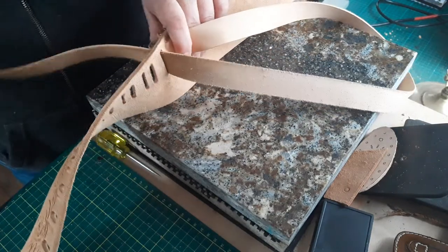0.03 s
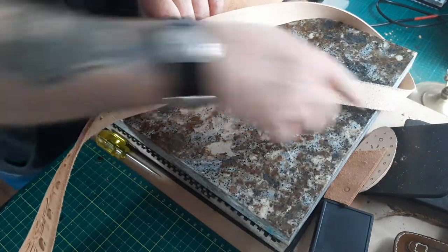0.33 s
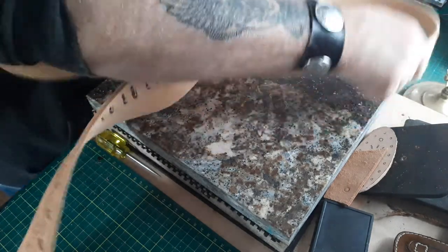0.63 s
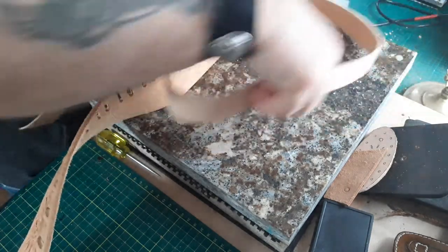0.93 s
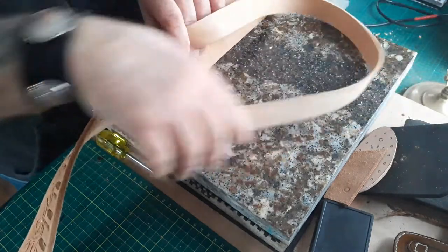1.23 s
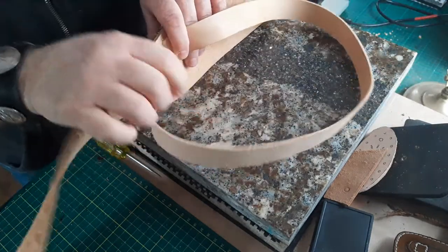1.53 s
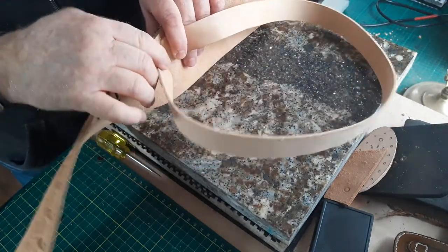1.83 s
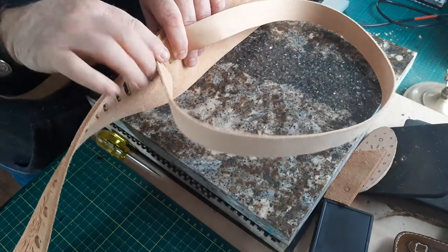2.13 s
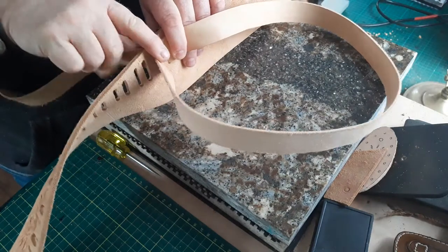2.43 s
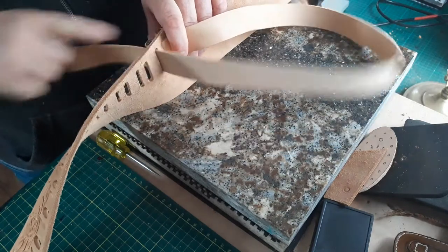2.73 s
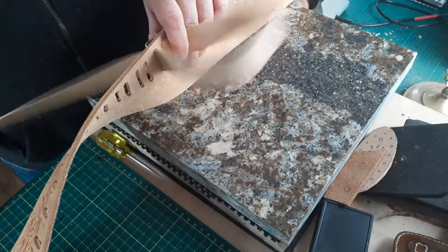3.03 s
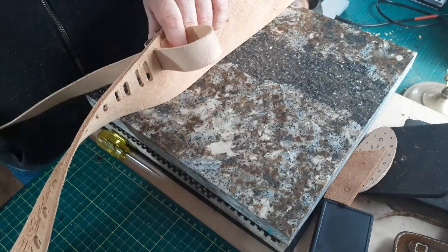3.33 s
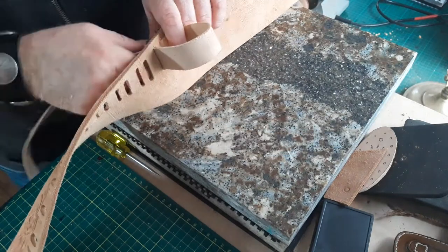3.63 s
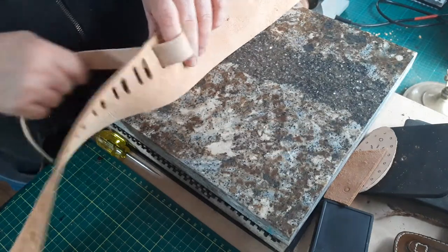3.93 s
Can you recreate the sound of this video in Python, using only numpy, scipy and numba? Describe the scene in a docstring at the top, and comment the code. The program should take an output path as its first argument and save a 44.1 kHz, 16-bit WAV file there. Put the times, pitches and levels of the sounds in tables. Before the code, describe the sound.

A leather strap is handled close by in a small room. It thumps softly on a slab at 0.4 seconds, followed by faint hand brushing and light knocks near 2.3. From 2.6 to 3.2 comes the main sound: one accelerating, rising rasp through a belt slot, with slight squeaks. Rubbing returns at 3.5, then a knock and two fingernail ticks around 3.9, over a faint low hum.

```python
"""Threading a leather strap

On a workbench in a small room, hands brush along a strap: catching fibres scuff, hiss and chirp.
The strap flops and knocks on the slab in damped thumps; fingernails and edges tick. One long,
accelerating pull drags it rasping through a slot in a belt, ringing the belt while the strap's
own resonance climbs. A low hum and faint hiss lie below."""
import sys
import numpy as np
from scipy import signal
from scipy.fft import rfft, irfft
from scipy.io import wavfile
from numba import njit

SR = 44100
rng = np.random.default_rng(int(sys.argv[2]) if len(sys.argv) > 2 else 0)


def int16_out(signal):
    """Quantize to a 16-bit WAV file."""
    q = np.round(np.clip(np.atleast_2d(signal).T, -1, 1) * 32767)
    wavfile.write(sys.argv[1], SR, q.astype(np.int16))


N = 176400
T, FREQS = np.arange(N) / SR, np.maximum(np.fft.rfftfreq(N) * SR, 1)

# envelope of the long pull: (time [s], friction level [dB], hiss boost [dB])
PULL_ENVELOPE = [(2.56, -86, 10), (2.615, -71, 20), (2.67, -59.5, 8), (2.775, -54, 5), (2.815, -44.5, 1),
                 (3.065, -37.5, -0.5), (3.098, -39.5, 1.5), (3.114, -49, 5.5), (3.152, -45.5, 2),
                 (3.19, -73, 13), (3.3, -75, 2)]
# the strap resonates higher as the pull speeds up: (time [s], centre [Hz], level [dB])
STRAP_SWEEP = [(2.6, 630, -83), (2.67, 670, -50.5), (2.78, 800, -50.5), (2.86, 985, -42.5),
               (3.03, 1300, -46.5), (3.09, 1390, -81)]
# resonances of the slotted belt: (pitch [Hz], width [Hz], level against the friction [dB])
BELT_MODES = [(205, 28, -19.5), (455, 19, -16.5), (1279, 12, -10.5)]
# brush strokes: (start [s], attack [s], hold [s], scuff [dB], rasp [dB], hiss [dB])
STROKES = [ (0.372, .012, 0.1, -72, -68.5, -58.5), (0.496, 0.028, 0.078, -67.5, -62, -55.5),
           (0.745, 0.038, 0.08, -68.5, -72.5, -66), (0.879, 0.0056, 0.039, -70, -55.5, -66),
           (0.96, 0.056, 0.031, -84, -67, -59), (1.135, 0.013, 0.058, -71, -67.5, -61.5),
           (1.28, 0.032, 0.072, -75.5, -87, -65.5), (1.495, 0.063, 0.07, -68, -70.5, -62),
           (1.557, 0.022, 0.003, -78, -74, -51.5), (1.724, 0.03, 0.04, -61, -74.5, -60),
           (1.877, 0.01, 0.023, -72.5, -59, -64), (2.1, 0.021, 0.007, -86, -78, -68),
           (2.25, 0.017, 0.058, -90, -70, -69), (2.488, 0.016, 0.0064, -74, -68.5, -65.5),
           (3.511, 0.022, 0.042, -60.5, -59.5, -54), (3.7, 0.025, 0.25, -57, -61, -58.5),
           (3.77, 0.074, 0.043, -52.5, -51.5, -62)]
# the leather catches and sings: (peak time [s], half length [s], pitch [Hz], sharpness [Q], level [dB])
CATCHES = [ (0.408, 0.033, 2240, 10, -67), (0.408, 0.034, 1286, 4.5, -68), (0.543, .026, 2210, 7.7, -64.5),
           (0.544, 0.021, 5050, 4.3, -59.5), (0.606, 0.038, 4070, 6.2, -60), (0.607, 0.035, 1375, 9, -63.5),
           (0.612, 0.023, 948, 7.4, -59.5), (0.798, 0.023, 4230, 10, -67), (1.214, 0.037, 4430, 12, -71),
           (1.326, 0.022, 5540, 16, -69), (2.687, 0.046, 4250, 7, -59.5), (2.868, 0.096, 4100, 13, -45.5),
           (3.035, 0.0091, 1306, 9, -37), (3.048, 0.019, 2150, 4.5, -40.5),
           (3.061, 0.013, 5700, 6.4, -43.5), (3.134, 0.0091, 3710, 6.1, -39.5),
           (3.843, 0.028, 3800, 3.9, -51.5)]
# flops and knocks: (time [s], level [dB], pitch [Hz], decay t60 [s], slap level [dB])
KNOCKS = [ (0.3831, -21, 181, 0.029, -64), (0.403, -37, 175.7, 0.12, -66), (.86, -49.5, 527, 0.037, -53.5),
          (2.266, -43, 1243, 0.037, -45), (2.2946, -36, 984, 0.019, -43.5), (2.297, -29.5, 413, 0.026, -63),
          (2.2984, -42, 170, 0.15, -77), (3.514, -38, 182, 0.08, -47), (3.8343, -22.5, 472, 0.042, -47.5)]
# fingernail and strap-edge contacts: (time [s], level [dB])
NAIL_TICKS = [(0.883, -48), (2.047, -69), (2.2123, -64), (3.891, -43), (3.905, -40)]
# reflections off nearby surfaces: (delay [s], level [dB])
REFLECTIONS = [(0.0102, -14.5), (0.0256, -16.5)]

# tone of the friction in the slot: (frequency [Hz], relative level [dB])
SLOT_EQ = [(70, -22), (190, 0.5), (330, -11.5), (480, 4), (750, -4), (1250, -3.5), (2400, -4.5), (5000, -6),
           (6200, -10), (8500, -23.5), (10000, -33.5)]
# dull scuff of a stroke: (frequency [Hz], relative level [dB])
SCUFF_EQ = [(80, 2), (180, 3.5), (480, 9), (950, -1), (1370, 3.5), (1700, -13.5), (4000, -6)]
# bright rasp of a stroke: (frequency [Hz], relative level [dB])
RASP_EQ = [(700, -42), (1800, -3.5), (2300, -5.5), (2900, -9.5), (4200, 3.5), (5300, 3), (8500, -11),
           (10000, -28)]
# fine hiss of skin and leather: (frequency [Hz], relative level [dB])
HISS_EQ = [(1500, -24), (5000, -13.5), (8500, -2), (9600, -12.5), (15500, -1)]
# dull slap on the slab: (frequency [Hz], relative level [dB])
SLAP_EQ = [(100, 3), (1100, -7), (4500, -31)]
# bright snap of a tick: (frequency [Hz], relative level [dB])
TICK_EQ = [(1800, -2), (5000, 8), (14000, -16)]
# room tone: (frequency [Hz], relative level [dB])
ROOM_TONE_EQ = [(25, -21.5), (50, -7.5), (95, 4.5), (135, -5), (190, -4.5), (280, -15.5), (700, -21.5),
                (2800, -29), (8500, -25.5), (9600, -33.5)]


def pull(hiss_trim_db=-3.5, strap_q=1.54):
    """The strap drags through the slot; its grain excites the belt and the loop of strap."""
    level_db, hiss_db = automation(PULL_ENVELOPE)
    strap_hz, strap_db = automation(STRAP_SWEEP)
    rasp = colour(grains(), SLOT_EQ)
    for hz, width_hz, db in BELT_MODES:
        rasp += from_db(db) * rms_one(resonate(grains(), hz, width_hz))
    rasp += from_db(hiss_trim_db + hiss_db) * colour(grains(), HISS_EQ)
    w = 2 * np.pi * strap_hz / SR
    first_pass = swept_band(grains(), w, strap_q) * np.sqrt(w)
    strap = rms_one(swept_band(first_pass, w, strap_q))
    moving = (T > PULL_ENVELOPE[0][0]) & (T < PULL_ENVELOPE[-1][0])
    return moving * (from_db(level_db) * rasp + from_db(strap_db) * strap)


def hand_rubs():
    """Each stroke swells, holds and dies, with its own blend of scuff, rasp and skin hiss."""
    textures = [colour(grains(), eq) for eq in (SCUFF_EQ, RASP_EQ, HISS_EQ)]
    power = np.zeros_like(textures)
    for start, attack, hold, *levels_db in STROKES:
        envelope = ramp(T - start, attack) * decay(T - start - attack - hold, t60=0.29)
        power += np.square(np.outer(from_db(levels_db), envelope))
    return sum(np.sqrt(power) * textures)


def leather_chirps(octaves_per_s=0.32):
    """The sliding strap catches and sings briefly in a narrow band that bends slightly upward."""
    out = np.zeros(N)
    for peak, half_length, hz, q, db in CATCHES:
        near = np.abs(T - peak) < 3 * half_length
        t = T[near] - peak
        pitch_hz = hz * np.exp2(octaves_per_s * t)
        w = 2 * np.sin(np.pi * pitch_hz / SR)
        swell = np.exp(-np.square(t / half_length))
        first_pass = swept_band(grains()[near], w, q)
        tone = swell * swept_band(first_pass, w, q)
        out[near] += from_db(db) * tone * np.linalg.norm(swell) / np.linalg.norm(tone)
    return out


def strap_thumps(attack_cycles=0.9):
    """The strap lands softly on the slab: a heavily damped swing under a short, dull slap."""
    out = np.zeros(N)
    slap = colour(rng.standard_normal(N), SLAP_EQ)
    for start, db, hz, t60, slap_db in KNOCKS:
        age = T - start
        swing = np.sin(2 * np.pi * hz * age)
        out += from_db(db) * ramp(age, attack_cycles / hz) * decay(age, t60) * swing
        out += from_db(slap_db) * ramp(age, attack_s=0.0012) * decay(age, t60=0.093) * slap
    return out


def nail_ticks():
    """Fingernails and strap edges make small hard contacts: bright and gone at once."""
    envelope = sum((T >= start) * from_db(db) * decay(T - start, t60=0.024) for start, db in NAIL_TICKS)
    return colour(rng.standard_normal(N), TICK_EQ) * envelope


def grains(per_s=8000, spread_db=3.0):
    """Fibres catch and slip: dense clicks of uneven size, the raw stuff of all the friction."""
    sizes = from_db(spread_db * np.minimum(rng.exponential(size=N), 4))
    polarity = np.sign(rng.standard_normal(N))
    slips = rng.random(N) < per_s / SR
    return rms_one(sizes * polarity * slips)


def shifting_contact(friction, depth_db=2.5):
    """Third-octave bands swell and fade independently as the contact shifts."""
    spectrum, centres_hz = rfft(friction), np.geomspace(250, 16000, 19)
    out = np.zeros(N)
    for solo in np.eye(len(centres_hz)):
        band = irfft(spectrum * np.interp(FREQS, centres_hz, solo), N)
        out += band * from_db(depth_db * drift(rate_hz=11.4))
    return out


def room(x, tail_db=-10.5, damping_hz=4030, ring_db=1):
    """Early reflections, a short dull tail, and something on the bench ringing along faintly."""
    last_reflection = max(delay for delay, _ in REFLECTIONS)
    tail = rng.standard_normal(N) * decay(T, t60=0.26) * ramp(T, last_reflection)
    response = from_db(tail_db) * tail / np.linalg.norm(tail)
    for delay, db in REFLECTIONS:
        response[int(delay * SR)] += from_db(db)
    response = signal.sosfilt(signal.butter(1, damping_hz, fs=SR, output="sos"), response)
    ring = from_db(ring_db) * resonate(x, hz=1373, width_hz=3.2)
    return x + signal.fftconvolve(x, response)[:N] + ring


def room_tone(noise_db=-65, hum_db=-73.5, hum_hz=100):
    """A steady bed of rumble, hiss and weak mains hum."""
    noise = from_db(noise_db) * colour(rng.standard_normal(N), ROOM_TONE_EQ)
    return noise + from_db(hum_db) * np.sin(2 * np.pi * hum_hz * T)


def from_db(db):
    """Decibels to gain."""
    return 10 ** (np.asarray(db) / 20)


def rms_one(x):
    """Scale to unit rms."""
    return x / np.std(x)


def ramp(age, attack_s):
    """A linear attack."""
    return np.clip(age / attack_s, 0, 1)


def decay(age, t60):
    """Full level until age zero, then a fall of 60 dB every t60 seconds."""
    return from_db(-60 * np.clip(age / t60, 0, 3))


def automation(breakpoints):
    """One curve over time for each value column."""
    times, *columns = np.transpose(breakpoints)
    return [np.interp(T, times, column) for column in columns]


def colour(x, eq, skirt_db=5.5):
    """Shape x with an EQ curve that rolls off ever faster beyond its ends; unit rms."""
    hz, db = np.transpose(eq)
    octaves_beyond = np.log2(FREQS / np.clip(FREQS, min(hz), max(hz)))
    gain_db = np.interp(np.log(FREQS), np.log(hz), db) - skirt_db * np.square(octaves_beyond)
    return rms_one(irfft(rfft(x) * from_db(gain_db), N))


def drift(rate_hz):
    """Slow random modulation at unit rms."""
    spectrum = rfft(rng.standard_normal(N))
    return rms_one(irfft(spectrum / (1 + np.square(FREQS / rate_hz)), N))


def resonate(x, hz, width_hz):
    """A resonance with unity gain at its peak."""
    return signal.lfilter(*signal.iirpeak(hz, hz / width_hz, fs=SR), x)


@njit
def swept_band(x, w, q):
    """A resonant band-pass whose centre w (radians a sample) moves."""
    out, low, band = np.zeros(len(x)), 0.0, 0.0
    for i in range(len(x)):
        low += w[i] * band
        band += w[i] * (x[i] - low - band / q)
        out[i] = band / np.sqrt(w[i])  # keeps noise equally strong along the sweep
    return out


def scene(side_db=-84):
    """Everything sits in the centre; only a trace of hiss gives stereo width."""
    friction = shifting_contact(pull() + hand_rubs())
    handling = friction + leather_chirps() + strap_thumps() + nail_ticks()
    mid = room(handling) + room_tone()
    side = from_db(side_db) * rng.standard_normal(N)
    return np.array([mid + side, mid - side])


def record(dry):
    """A steep high cut at 15.75 kHz."""
    return signal.sosfilt(signal.ellip(12, .1, 80, 15750, fs=SR, output="sos"), dry)


dry = scene()
out = record(dry)
int16_out(out)
```